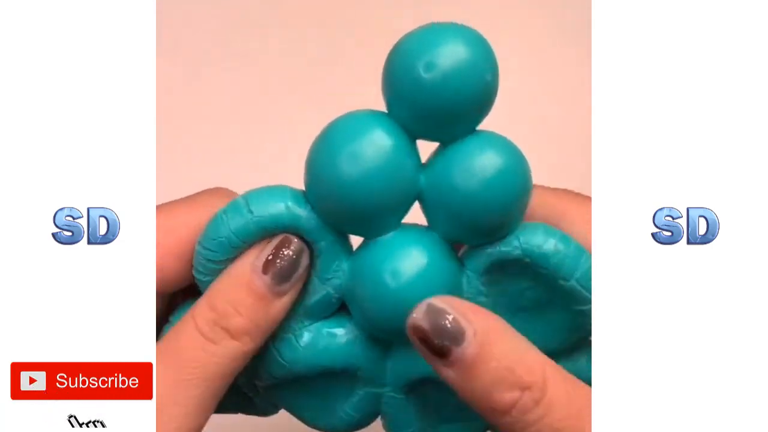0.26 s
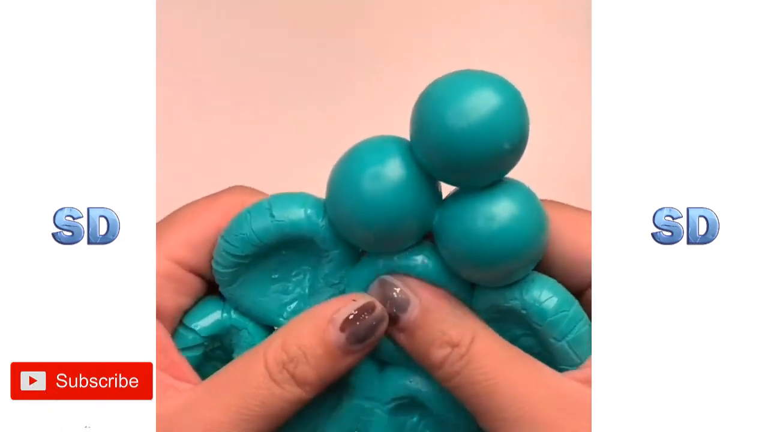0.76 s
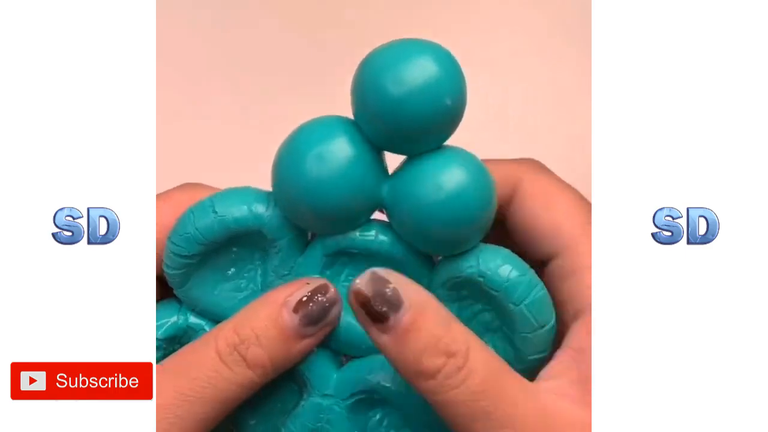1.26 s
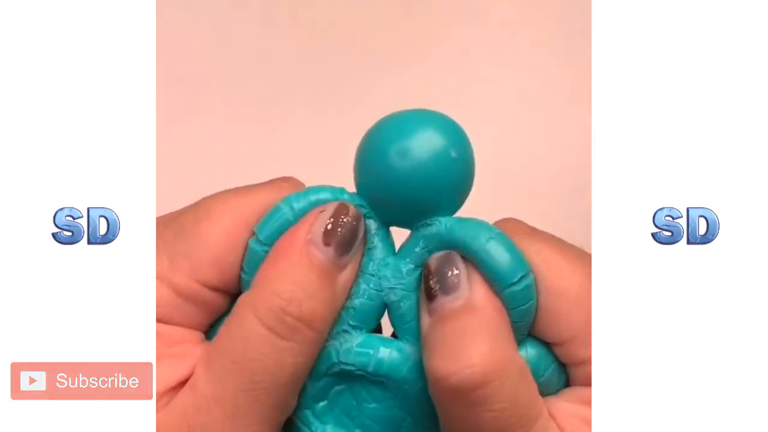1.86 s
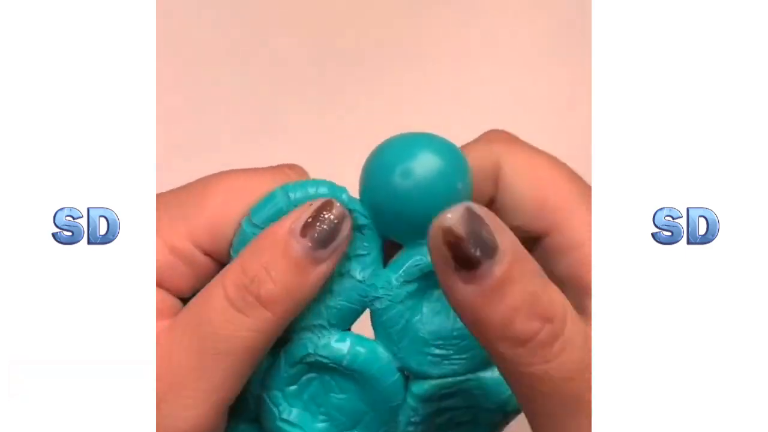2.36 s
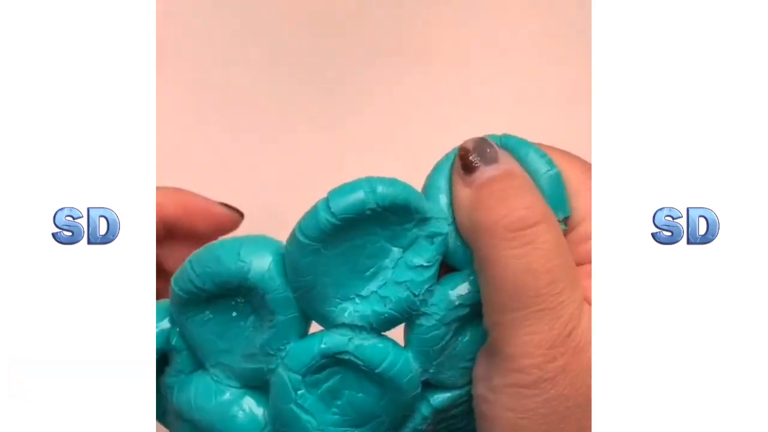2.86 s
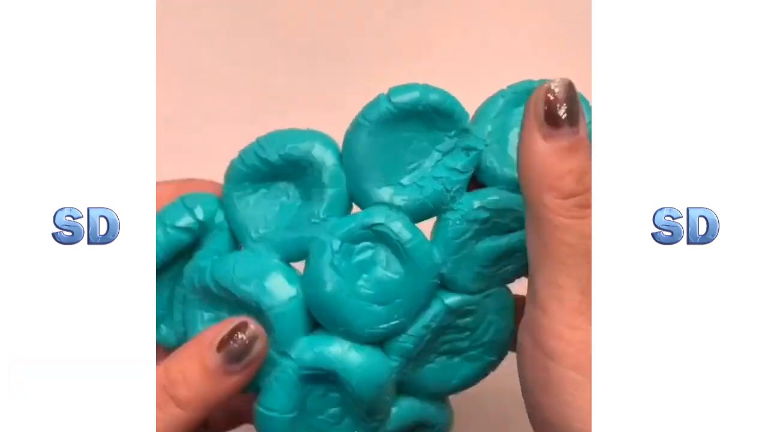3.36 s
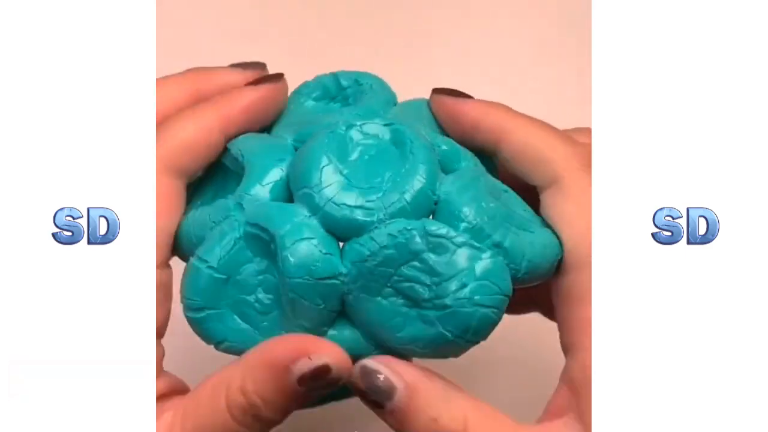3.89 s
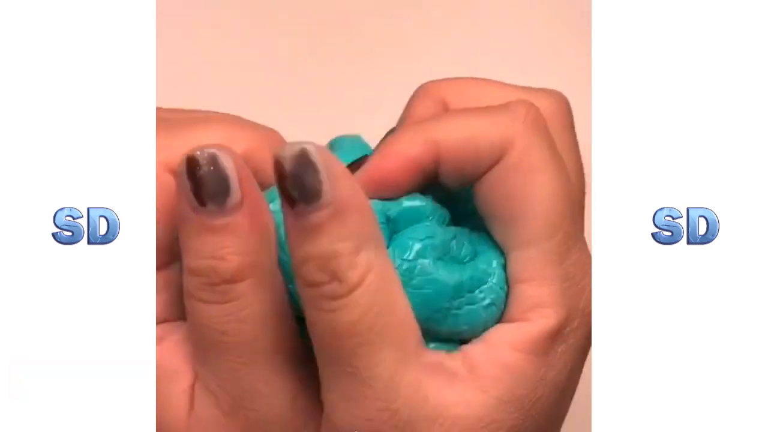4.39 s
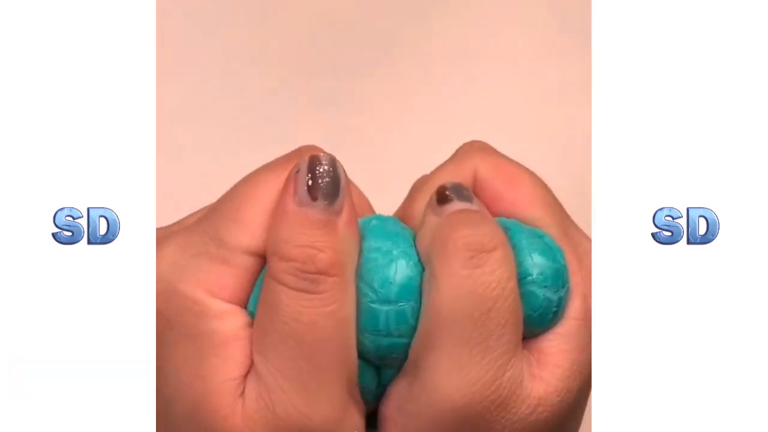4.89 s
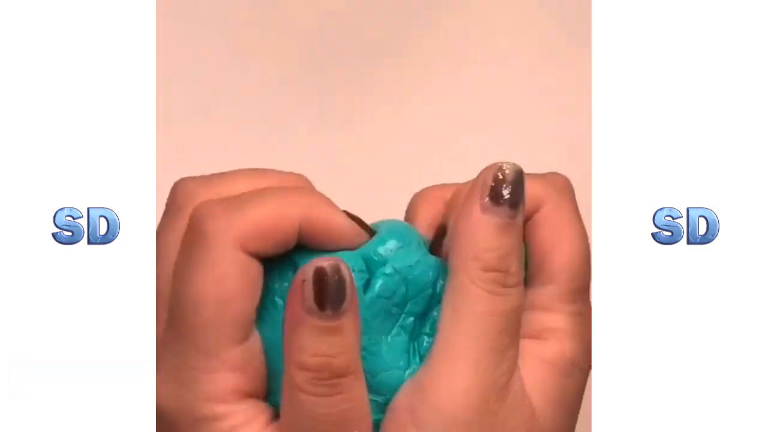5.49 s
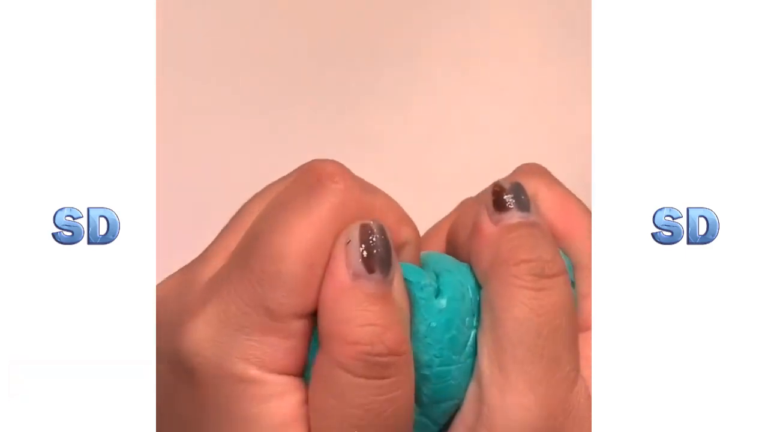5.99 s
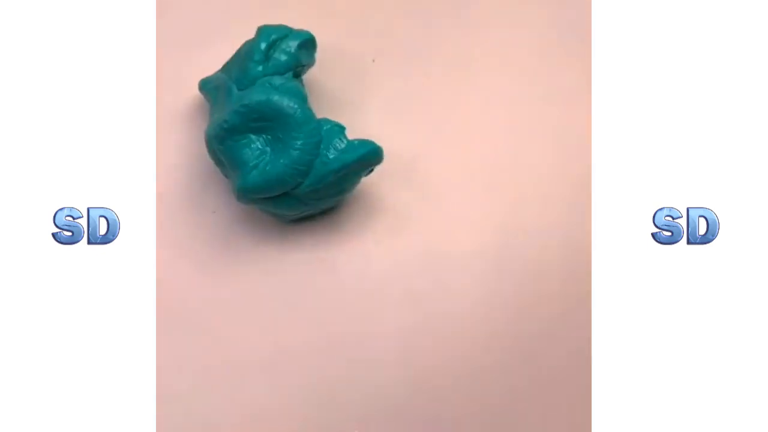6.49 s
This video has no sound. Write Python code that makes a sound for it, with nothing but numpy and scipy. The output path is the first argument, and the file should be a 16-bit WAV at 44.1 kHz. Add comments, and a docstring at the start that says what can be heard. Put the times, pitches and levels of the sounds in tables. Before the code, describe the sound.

Close, crisp crackles and sharp snaps as thumbs crush brittle-skinned soft balls in bursts, with dull wet clicks and soft table thuds.

```python
"""Brittle-skinned balls crushed by hand

Thumbs crush soft balls with a thin brittle skin just above a table, close to a two-port microphone.
The skin breaks in snaps and dense crackle: decaying noise bursts, sticky pops, wet smacks and a hollow shell's ring.
Hands and the lump bump the table top, whose damped modes thud and knock; filtered noise is the quiet room's murmur."""
import sys
import numpy as np
from scipy import signal
from scipy.fft import rfft, irfft, next_fast_len
from scipy.io import wavfile
from scipy.ndimage import uniform_filter1d, map_coordinates

SR = 44100
rng = np.random.default_rng(int(sys.argv[2]) if len(sys.argv) > 2 else 0)


def dump(signal):
    """Clip the signal to [-1, 1] and save it as 16-bit WAV at the path in sys.argv[1]."""
    limited = np.clip(np.atleast_2d(signal).T, -1, 1)
    pcm = np.round(limited * 32767).astype(np.int16)
    wavfile.write(sys.argv[1], SR, pcm)


N = 297234  # length in samples

# Loud breaks of the skin. Each row: time in seconds, shortly before the break, nominal level in dB.
SKIN_BREAKS = [(0.0943, -28.5), (0.178, -30), (0.3073, -33), (0.443, -38), (0.5348, -34.5), (0.7657, -29),
               (0.7847, -27.5), (0.8045, -24), (0.83, -25), (0.8413, -21.5), (0.8974, -23.5), (0.911, -21),
               (0.946, -22), (0.9721, -16.5), (0.9812, -24.5), (0.993, -24.5), (1.064, -30.5),
               (1.1021, -22), (1.143, -31.5), (1.346, -30.5), (1.718, -39.5), (1.731, -42.5), (1.7482, -33),
               (1.7731, -28), (1.7887, -19), (1.7993, -16.5), (1.819, -12.5), (1.8691, -15.5),
               (1.8806, -23.5), (1.9115, -16.5), (1.9637, -20), (1.9874, -14), (2.0027, -22), (2.0328, -26),
               (2.0579, -15), (2.1497, -25.5), (2.224, -32), (2.3039, -23), (2.388, -30.5), (2.6711, -34),
               (2.7366, -19), (2.7562, -10.5), (2.769, -22), (2.783, -16.5), (2.7957, -12.5),
               (2.820, -17.5), (2.8633, -23.5), (2.868, -21.5), (2.932, -23), (3.02, -26.5), (3.035, -21.5),
               (3.1258, -27), (3.1485, -17.5), (3.2149, -22.5), (3.4028, -29.5), (3.9871, -35),
               (4.4876, -26), (4.5019, -32), (4.547, -23), (4.569, -26), (4.572, -18), (4.5984, -21.5),
               (4.6625, -39), (4.7021, -17.5), (4.8439, -27.5), (4.9383, -30), (5.021, -29.5),
               (5.693, -26.5), (5.8645, -29), (5.8753, -25.5), (5.9712, -32), (6.1634, -44), (6.166, -30.5),
               (6.335, -26.5), (6.7005, -46)]
BREAK_LAG_S = 0.0015  # from listed time to break
SHELL_HZ = 2080  # pitch of the hollow shell


def amp(db):
    """Level definition: twenty decibels are a factor of ten in amplitude."""
    return 10 ** (np.asarray(db) / 20)


def unit(x):
    """Normalisation by mean power: the result has an rms of 1."""
    return x / np.sqrt(np.mean(x ** 2) + 1e-20)


def along(points, hz):
    """Logarithmic frequency scale: values given at a few frequencies are joined by straight lines on it."""
    point_hz, value = np.transpose(points)
    return np.interp(np.log(hz + 1), np.log(point_hz + 1), value)


def curves(rows):
    """Linear interpolation in time: one value per sample for each column after the time."""
    s, *columns = np.transpose(rows)
    return [np.interp(np.arange(N) / SR, s, column) for column in columns]


def wobble(rate):
    """Band-limited random fluctuation: a smooth curve through random knots, rate of them a second."""
    knots = rng.standard_normal(int(N * rate / SR) + 4)
    return map_coordinates(knots, [np.arange(N) * rate / SR])


def filtered(x, response):
    """Linear filtering: the spectrum is multiplied by a complex response of frequency."""
    length = next_fast_len(N + SR // 2)
    hz = np.fft.rfftfreq(length, 1 / SR)
    return irfft(rfft(x, length) * response(hz), length)[..., :N]


def resonance(hz, centre_hz, width_hz):
    """Damped oscillator: the causal response of one mode, 1 at its centre."""
    damping = 1j * hz * width_hz
    return damping / (centre_hz ** 2 - hz ** 2 + damping)


def spikes(s, db):
    """Energy addition: impulses of power at their samples; db has one column per part of the spectrum."""
    at = np.clip((s * SR).astype(int), 0, N - 1)
    return np.array([np.bincount(at, amp(2 * part), N) for part in db.T])


def dying(power, t60):
    """Exponential decay: every spike of power falls 60 dB in t60 seconds; the root is an amplitude envelope."""
    kept_per_sample = amp(-2 * 60 / (t60 * SR))
    return np.sqrt(signal.lfilter([1], [1, -kept_per_sample], power))


def breaks(power, click_t60, tail_t60, tail_db):
    """Two-stage decay: each break is a sharp click with a weaker rustling tail."""
    return dying(power, click_t60) + amp(tail_db) * dying(power, tail_t60)


def background():
    """Spatial coherence: the table rumbles much alike at both ports, the room's murmur is mostly unrelated."""
    # Each row: time in seconds, then rumble and murmur levels in dB before trim and sway.
    under = [(0.0, -82, -96), (0.495, -81, -69), (0.72, -73.5, -84), (1.62, -74.5, -79), (3.03, -77, -75),
             (3.613, -81, -83.5), (4.811, -74.5, -68), (5.773, -78, -75.5), (6.635, -61, -77.5),
             (6.652, -64.5, -72)]
    # Spectra. Each row: frequency in Hz, relative level in dB.
    rumble_colour = [(18, -58), (30, -17.5), (63, -6), (102, 0), (160, -26), (210, -13), (350, -120)]
    murmur_colour = [(140, 0), (330, 1), (490, 2.5), (600, -12), (1500, -5), (16000, -26.5)]
    rumble_db, murmur_db = curves(under)
    shared, *own = rng.standard_normal((3, N))
    rumble_noise = shared + 0.26 * np.array(own)
    rumble = unit(filtered(rumble_noise, lambda hz: amp(along(rumble_colour, hz))))
    shared, *own = rng.standard_normal((3, N))
    murmur_noise = 0.31 * shared + np.array(own)
    murmur = unit(filtered(murmur_noise, lambda hz: amp(along(murmur_colour, hz))))
    rumble_sway_db, murmur_sway_db = 4 * wobble(9), 4 * wobble(22)
    rumble_gain = amp(rumble_db - 5.5 + rumble_sway_db)
    murmur_gain = amp(murmur_db + 2.5 + murmur_sway_db)
    return rumble_gain * rumble + murmur_gain * murmur


def kneading():
    """Power addition of presses: each rises, sags while held and lets go; its hollow part fades as the shell flattens.

    Gives the crackle's level in dB and its hollow part's level relative to that."""
    # Presses of thumbs and palms. Each row: time of full pressure, rise and hold in seconds,
    # crackle level in dB before trim, its hollow part at first in dB relative to that.
    presses = [(0.019, 0.46, 0.028, -53, -20.5), (.09, 0.13, 0.16, -70.5, -11),
               (0.296, 0.02, 0.012, -46.5, -12), (0.444, 0.15, 0.11, -63, -3.5),
               (0.774, 0.017, 0.23, -43.5, -4), (1.021, .1, 0.13, -55.5, -13),
               (1.331, 0.16, 0.0043, -50.5, -7.5), (1.458, 0.12, 0.14, -67.5, -1),
               (1.796, 0.043, 0.13, -34.5, -6.5), (1.961, 0.022, .11, -43, -10),
               (2.098, 0.071, 0.17, -57, -12), (2.37, 0.096, 0.0084, -51.5, -0.5),
               (2.429, 0.11, 0.12, -58, -13.5), (2.741, 0.034, 0.24, -39, -6),
               (3.07, 0.24, 0.23, -57.5, -6), (3.399, 0.16, 0.1, -55.5, -12),
               (3.722, 0.045, 0.17, -65, -4.5), (3.901, 0.22, 0.028, -54.5, -7.5),
               (4.017, 0.058, 0.012, -50, -19), (4.2, 0.15, 0.054, -56.5, -11.5),
               (4.29, 0.21, 0.23, -52.5, -8), (4.504, 0.092, 0.24, -38.5, -8.5),
               (4.847, 0.16, 0.024, -50, -10), (4.93, 0.032, 0.16, -61, -31),
               (5.104, 0.061, 0.013, -45, -4.5), (5.368, 0.5, 0.01, -55.5, -4),
               (5.622, 0.2, 0.3, -47, -6.5), (6.03, 0.096, 0.514, -65.5, -9.5),
               (6.169, 0.083, 0.11, -50.5, -2), (6.325, 0.014, 0.023, -52.5, -5.5)]
    rise_db, sag_db_per_s = 34, 16.5  # climb over the rise; fall from full pressure on
    release_db_per_s = 352.5  # further fall once let go
    collapse_db, collapse_s = 16.5, 0.22  # loss of hollowness and its time constant
    floor_db, floor_hollow_db = -103, 5.5  # inaudible floor that keeps the logarithm finite
    start, rise, held, db, hollow_db = np.transpose(presses)[..., None]
    t = np.arange(0, N / SR, 1 / 1000)
    age = np.maximum(t - start, 0)
    climb_db = rise_db * np.maximum(start - t, 0) / rise
    release_db = release_db_per_s * np.maximum(age - held, 0)
    level_db = db - climb_db - sag_db_per_s * age - release_db
    hollow_db = hollow_db - collapse_db * (1 - np.exp(-age / collapse_s))
    body = amp(2 * level_db).sum(axis=0) + amp(2 * floor_db)
    hollow = amp(2 * (level_db + hollow_db)).sum(axis=0) + amp(2 * (floor_db + floor_hollow_db))
    return curves(np.transpose([t, 10 * np.log10(body), 10 * np.log10(hollow / body)]))


def crackle(count=9000):
    """Random impulse process: countless tiny breaks, most faint and a few strong, clump under the kneading hands."""
    luck = rng.random((count, 2))
    size_db = -5.5 * np.log(luck[:, 1:]) + 4.5 * rng.standard_normal((count, 3))
    power = spikes(luck[:, 0] * N / SR, np.minimum(size_db, 18))
    body_db, hollow_db = kneading()
    clumps_db = 1.72 * wobble(40)
    part_db = np.array([hollow_db + 14, 0 * body_db, 0 * body_db])  # hollow, middle, bright
    level_db = body_db - 10.5 + part_db + clumps_db
    return amp(level_db) * breaks(power / power.mean(), click_t60=0.00031, tail_t60=0.05, tail_db=-14.5)


def pops(count=1200, size=400):
    """Damped free oscillation: sticky pockets ring briefly, many near the shell's pitch, most others higher."""
    luck, pitch_luck = rng.random((count, 7)), rng.standard_normal((count, 1))
    at = (luck[:, :1] * (N - size)).astype(int)
    shell_hz = SHELL_HZ * np.exp(0.062 * pitch_luck)
    other_hz = np.minimum(5500 * np.exp(.45 * pitch_luck), SR / 3)
    hz = np.where(luck[:, 6:] < .45, shell_hz, other_hz)
    body_db, hollow_db = kneading()
    hollow_gain_db = np.where(hz < 2800, hollow_db[at] + 9.5, 0)
    level_db = body_db[at] + hollow_gain_db - 2.3 * np.log(luck[:, 1:2]) - 2.5
    t = np.arange(size) / SR
    t60 = (10 + 22 * luck[:, 2:3]) / hz  # 10 to 32 cycles
    fade = amp(level_db - 60 * t / t60) * (1 - np.exp(-t * hz))
    where = (at + np.arange(size)).ravel()
    copies = []
    for k in (3, 4, 5):  # the same pops with other phases for each path to the ports
        ring = fade * np.sin(2 * np.pi * (hz * t + luck[:, k:k + 1]))
        copies.append(np.bincount(where, ring.ravel(), N))
    return np.array(copies)


def snaps(count=7):
    """Burst cluster: loud breaks, as hollow as the shell still is, amid smaller random tears."""
    crest_db = 7  # peak over envelope
    snap_hollow_db = 9.5  # hollow part over the crackle's
    s, db = np.transpose(SKIN_BREAKS)
    s = s + BREAK_LAG_S
    luck = rng.random((len(s), count, 4))
    hollow_db = kneading()[1][(s * SR).astype(int)] + snap_hollow_db
    bright_db = 5 * luck[:, 0, 0] - 1.5
    level = db[:, None] - crest_db + np.transpose([hollow_db, 0 * db, bright_db])
    tear_s = s[:, None] + 0.0053 * luck[..., 0] - .003
    tear_db = level[:, None] - 7.5 - 14 * luck[..., 1:]
    power = spikes(s, level) + spikes(tear_s.ravel(), tear_db.reshape(-1, 3))
    return breaks(power, click_t60=0.0019, tail_t60=0.033, tail_db=-10)


def rustle(envelope):
    """Modulated noise: three unrelated noises share the envelopes of the hollow, middle and bright part."""
    # Colour of the breaking skin at one port. Each row: frequency in Hz, relative level in dB.
    skin_colour = [(300, -26), (700, -17), (1400, -8), (2600, -7.5), (4400, 2), (7000, 1), (13500, -0.5),
                   (15600, -2.5), (16000, -37)]
    signs = rng.choice([-1, 1], (3, 1, N))

    def parts(hz):
        """Power-complementary crossover: the three squared band gains sum to the skin's, save a tiny overlap."""
        hollow = 1 / (1 + (hz / 2800) ** 6)
        bright = 1 / (1 + (9500 / (hz + 1)) ** 6)
        shares = [hollow, (1 - hollow) * (1 - bright), bright]
        return amp(along(skin_colour, hz)) * np.sqrt(shares)

    return filtered(signs * envelope, parts).sum(axis=1)


def patchy(copies, depth_db):
    """Time-varying filtering: a smooth random gain field over time and frequency shifts the colour in patches."""
    spectrum = signal.stft(copies, nperseg=256)[2]
    field = rng.standard_normal(spectrum.shape[1:])
    field = uniform_filter1d(field, size=5, axis=0)  # across frequency
    field = uniform_filter1d(field, size=6, axis=1)  # across time
    return signal.istft(spectrum * amp(depth_db * unit(field)), nperseg=256)[1][:, :N]


def shell():
    """Impulse-excited resonance: every loud break rings the shell, the more the hollower it still is."""
    width_hz, shell_db = 138, 20.5
    s, db = np.transpose(SKIN_BREAKS)
    at = ((s + BREAK_LAG_S) * SR).astype(int)
    blows = np.zeros((3, N))  # one copy for each path to the ports
    strength = amp(db + kneading()[1][at] + shell_db)
    blows[:, at] = strength * rng.standard_normal((len(s), 3)).T
    return filtered(blows, lambda hz: resonance(hz, SHELL_HZ, width_hz))


def thuds():
    """Low-mode excitation: a soft push swings the table's lowest mode while the sliding hand makes the top rumble."""
    # Soft bumps. Each row: start in seconds, level in dB before trim, ring in Hz.
    bumps = [(0.458, -46.5, 82.8), (0.512, -49, 97.7), (1.238, -55, 73.4), (1.719, -57.5, 78.6),
             (2.179, -64, 94), (2.315, -59, 62), (3.083, -45, 82.6), (3.16, -54, 75.5), (3.715, -63, 80),
             (4.707, -51.5, 90), (6.075, -53.5, 95), (6.336, -41, 77.3), (6.413, -43.5, 60.4),
             (6.489, -49, 70), (6.562, -51.5, 80.7)]
    out, rub = np.zeros(N + SR), np.zeros(N + SR)
    t = np.arange(SR // 3) / SR
    for s, db, hz in bumps:
        push = amp(-60 * t / 0.047) * (t / 0.016) ** 2.42
        after_ring = 0.042 * amp(-60 * t / .5) * (1 - np.exp(-t / 0.079))
        swing = (push + after_ring) * np.sin(2 * np.pi * hz * t)
        at = round(s * SR)
        out[at:][:len(t)] += amp(db + 20.0) * swing
        rub[at:][:len(t)] += amp(db - 14.5 - 60 * t / 0.32)
    noise = filtered(rng.standard_normal(N), lambda hz: resonance(hz, 63, 150) ** 2)
    return out[:N] + rub[:N] * unit(noise)


def knocks():
    """Modal superposition: a knock rings the board's modes at slightly new pitches, unsteady under damping hands."""
    # Hard knocks on the table top. Each row: start in seconds, nominal level in dB.
    strikes = [(0.866, -35.5), (2.984, -36), (4.847, -38), (4.887, -50.5)]
    # Modes of the board, the lowest one building up later. Each row: mean frequency in Hz,
    # relative level in dB, 60 dB decay time in seconds, rise in seconds.
    board = [(111.4, -2, 0.22, 0.018), (228.6, -13, 0.12, 0.0032), (349, 6.5, 0.021, 0.0035),
             (627, -1.5, 0.026, 0.0024)]
    out = np.zeros(N + SR)
    t = np.arange(SR // 4) / SR
    for s, db in strikes:
        for hz, mode_db, t60, rise in board:
            size = amp(db + mode_db - 60 * t / t60) * (1 - np.exp(-(t / rise) ** 2))
            pitch_hz = hz * rng.normal(1, 0.042)
            phase_drift = np.cumsum(rng.normal(0, 0.05, len(t)))
            out[round(s * SR):][:len(t)] += size * np.sin(2 * np.pi * pitch_hz * t + phase_drift)
    return out[:N]


def smacks():
    """Heavily damped resonance: sticky dough lets go of a finger in a dull wet click, short of treble."""
    # Each row: start in seconds, level in dB before trim.
    releases = [(1.242, -51), (1.474, -44.5), (2.056, -39), (2.388, -40.5), (2.525, -43), (2.632, -40),
                (5.105, -39), (5.119, -36), (5.282, -29), (6.188, -34.5), (6.326, -40)]
    centre_hz, width_hz, t60, trim_db = 1480, 4200, 0.0074, 4
    s, db = np.transpose(releases)
    envelope = dying(spikes(s, db[:, None] + trim_db), t60)
    burst = envelope * rng.choice([-1, 1], (3, N))  # one copy for each path to the ports
    return filtered(burst, lambda hz: resonance(hz, centre_hz, width_hz) ** 2)


def at_ports(copies):
    """Direct and diffuse fields: one direct copy reaches both ports, a scattered one reaches each."""
    # The left port hears the skin first. Each row: frequency in Hz, lead over the right port in radians.
    phase_lead = [(0, 0.0), (2400, .3), (4300, 2.95), (5300, 3.3), (6100, 5.9), (7900, 6.8), (8900, 9.25),
                  (9700, 9.55), (12000, 11.9), (14500, 13.4)]
    # Hands and table scatter the rest. Each row: frequency in Hz, direct share of the power from 0 to 1.
    direct_share = [(300, .3), (1700, .9), (3200, .25), (4900, .95), (5700, .55), (7000, .92), (8400, .6),
                    (9300, .97), (10300, .3), (13200, .92), (15500, .65)]

    def share(hz):
        return np.clip(along(direct_share, hz), 0, 1)

    def lead(hz):
        radians = np.interp(hz, *np.transpose(phase_lead))
        return np.exp(.5j * radians * [[1], [-1]])  # half ahead at left, half behind at right

    direct = filtered(copies[0], lambda hz: np.sqrt(share(hz)) * lead(hz))
    scattered = filtered(copies[1:], lambda hz: np.sqrt(1 - share(hz)))
    return direct + scattered


def scene():
    """Linear superposition: skin, table and room add at the two ports."""
    envelope = np.hypot(snaps(), crackle())
    tearing = patchy(rustle(envelope), depth_db=2.5)
    skin = at_ports(tearing + pops() + shell() + smacks())
    skin = skin * amp([[-.3], [.3]])  # left, right
    table = thuds() + knocks() * amp([[-1.2], [1.2]])
    return skin + table + background()


def record(dry):
    """Band limitation: the recorder keeps nothing from 16900 Hz up."""
    return filtered(dry, lambda hz: hz < 16900)


dry = scene()
out = record(dry)
dump(out)
```